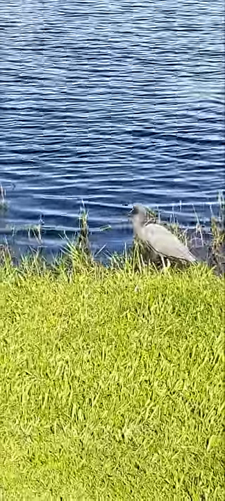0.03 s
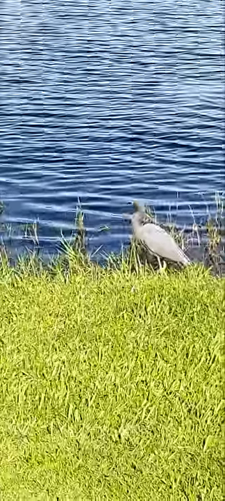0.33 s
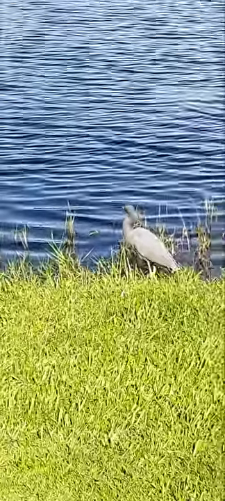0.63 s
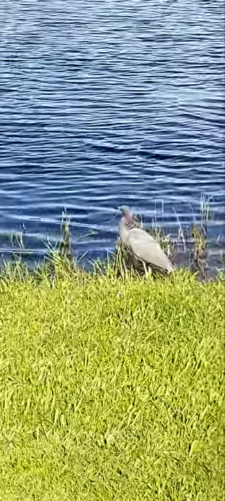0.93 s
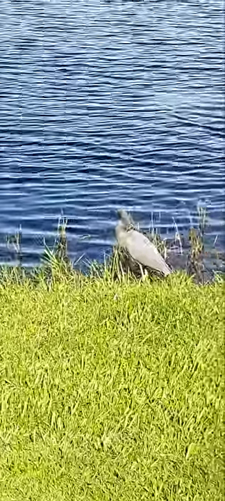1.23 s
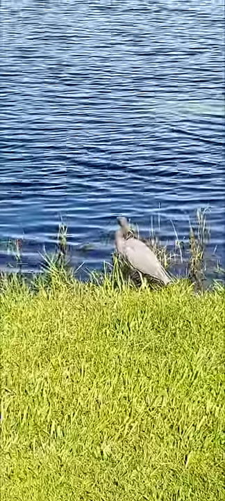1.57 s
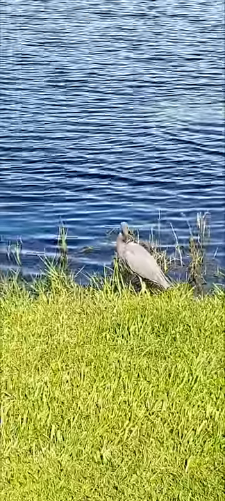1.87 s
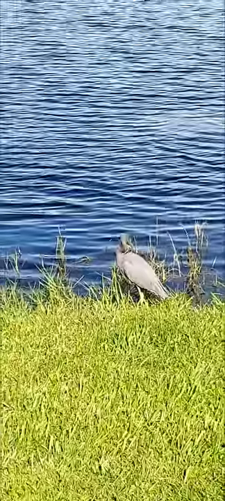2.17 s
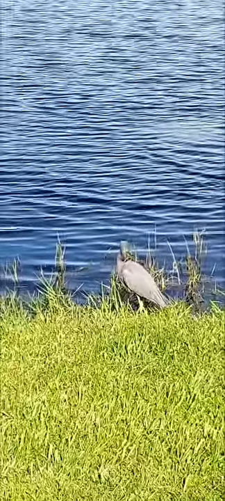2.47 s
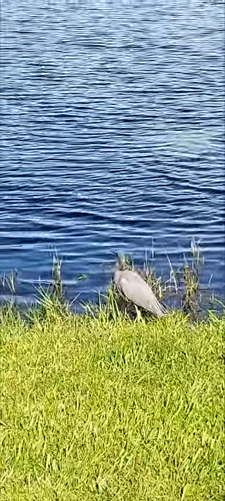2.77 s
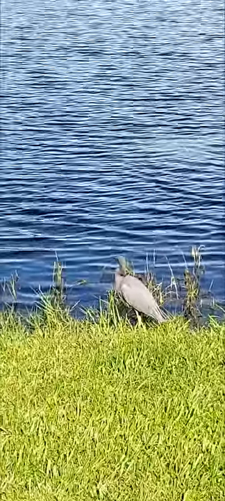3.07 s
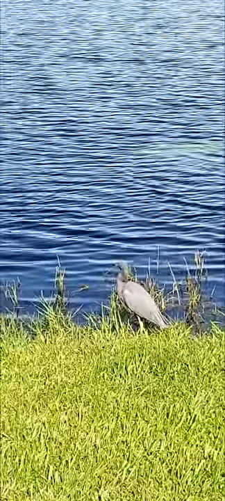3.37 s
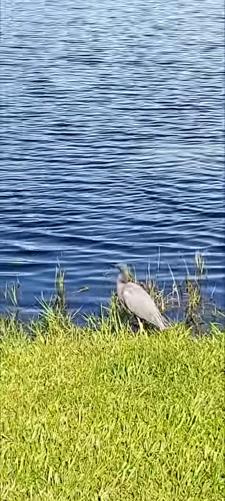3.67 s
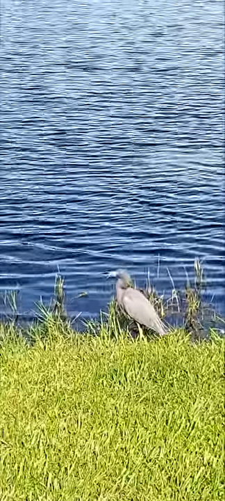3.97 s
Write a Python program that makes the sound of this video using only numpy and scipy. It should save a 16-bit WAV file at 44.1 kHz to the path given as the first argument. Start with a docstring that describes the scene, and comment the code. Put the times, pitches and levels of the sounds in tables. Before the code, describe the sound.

Small birds chirp and peep far off at a lakeside before nearer ones break into loud, high, slurred whistles with a slight echo. Wind brushes the microphone now and then over a low hum of distant traffic.

```python
"""Birds by a lake

Unseen birds call: a run of rising chirps, faint far peeps and thin high chips, then loud slurred
whistles from several near birds at once, thrown back by the banks. Chirps, peeps and whistles are
the wavering, almost pure tone of a syrinx. Distant traffic rumbles underneath, and light gusts
brush the two microphone ports."""
import sys
import numpy as np
from scipy import signal
from scipy.fft import rfft, irfft
from scipy.io import wavfile
from scipy.ndimage import uniform_filter1d

SR = 44100
rng = np.random.default_rng(int(sys.argv[2]) if len(sys.argv) > 2 else 0)


def to_wav(sig):
    """Store sig (one row per channel, or 1-D mono) as 16-bit WAV at the path in sys.argv[1].

    Samples outside -1..1 are clipped; the rate is SR.
    """
    pcm = np.clip(np.atleast_2d(sig), -1, 1) * 32767
    pcm = np.round(pcm).astype(np.int16)
    wavfile.write(sys.argv[1], SR, pcm.T)  # frames by channels


N = 176400
T = np.arange(N) / SR
BIN_HZ = np.fft.rfftfreq(N, 1 / SR)


def amp(db):
    """Decibels to gain."""
    return 10 ** (np.asarray(db) / 20)


def unit(x):
    """Scales to rms 1."""
    return x / np.sqrt(np.mean(x ** 2) + 1e-30)


def over_hz(points):
    """Draws a curve through (freq_hz, value) points on a log-frequency axis."""
    hz, value = np.transpose(points)
    return np.interp(np.log(BIN_HZ + 1), np.log(hz + 1), value)


def fader(points):
    """Gain ride through (time_s, level_db) points."""
    return amp(np.interp(T, *np.transpose(points)))


def add(mix, start_s, sound):
    """Drops a sound into the mix."""
    part = mix[..., max(round(start_s * SR), 0):][..., :sound.shape[-1]]
    part += sound[..., :part.shape[-1]]


def wobble(size, rate_hz):
    """Smooth random motion of rms 1."""
    hz = np.fft.rfftfreq(size, 1 / SR)
    return unit(irfft(rfft(rng.standard_normal(size)) * np.exp(-(hz / rate_hz) ** 2) * (hz > 0), size))


# Stereo image of a far source: freq_hz, coherence
IMAGE_COHERENCE = [(60, 0.97), (110, 1), (200, 0.98), (380, 0.75), (700, 0.52), (1290, 0.89), (2380, -0.12),
                   (4400, -0.93), (8120, -0.04), (15000, -0.0)]
# Its balance: freq_hz, left_over_right_db
IMAGE_BALANCE = [(60, 0), (99, -1), (160, -3), (270, -6), (450, -4.5), (740, 11), (1220, -7.5), (2010, -4),
                 (3330, 9), (5500, -6), (9080, 1.0), (15000, 2.5)]
# Its phase offset: freq_hz, right_lag_rad
IMAGE_PHASE = [(0, 1.6), (250, -0.11), (520, 0.5), (780, -0.37), (1210, 0.7), (2600, 2.5)]

def noise(spectrum, paired=True):
    """Coloured stereo noise, imaged as a far source or else independent on each port."""
    left, right = rfft(rng.standard_normal((2, N)))
    if paired:
        coherence = np.clip(over_hz(IMAGE_COHERENCE), -1, 1)
        balance = amp(over_hz(IMAGE_BALANCE))
        right = coherence * left + np.sqrt(1 - coherence ** 2) * right
        right *= np.exp(-1j * over_hz(IMAGE_PHASE))
        left, right = np.array([left * balance, right]) / np.sqrt(1 + balance ** 2)
    return unit(irfft(np.array([left, right]) * amp(over_hz(spectrum)), N))


# Engine rumble colour: freq_hz, gain_db
RUMBLE_EQ = [(15, -56), (25, -19.5), (48, -10.5), (65, -4.5), (92, -0.5), (108, -6), (123, -4.5),
             (134, -0.5), (168, -10), (205, -6), (352, -21), (375, -29), (480, -29.5), (620, -55.5),
             (1060, -120)]
# Engine hum: pitch_hz, level_against_rumble_db
HUM_TONES = [(120, -5), (351, -28)]
# Ride on rumble and hum: time_s, level_db
ENGINE_RIDE = [(0, -50), (.4, -53), (.8, -54), (1.4, -55), (1.8, -52.5), (2.1, -52), (2.92, -51),
               (3.04, -54), (3.3, -53.5), (4, -52)]
# Tyre wash colour: freq_hz, gain_db
TYRE_EQ = [(240, -41.5), (400, -12), (502, -10), (676, -1), (829, -3.5), (925, -4), (1150, -6),
           (1590, -19.5), (1720, -26), (2440, -34), (2600, -38), (3380, -40.5), (5720, -120)]
# Ride on the tyre wash: time_s, level_db
TYRE_RIDE = [(0, -65), (.4, -66.5), (.62, -65), (.85, -66.5), (1.25, -65.5), (1.75, -66), (2.2, -62.5),
             (2.55, -65), (3.25, -66), (3.55, -62.5), (4, -63)]
# Narrow tyre swells: peak_s, half_length_s, centre_hz, width_hz, level_db
TYRE_SWELLS = [(0.134, 0.12, 884, 150, -66), (2.05, 0.14, 1015, 216, -61), (2.69, 0.08, 736, 114, -68.5)]

def traffic():
    """Far engines rumble and hum under tyre noise that swells now and then."""
    hum = swells = 0
    for pitch_hz, db in HUM_TONES:
        drifting_hz = pitch_hz + 3.62 * wobble(N, rate_hz=5.2)
        hum += amp(db) * unit(np.sin(2 * np.pi * np.cumsum(drifting_hz) / SR))
    for peak_s, half_s, centre_hz, width_hz, db in TYRE_SWELLS:
        phase = 2 * np.pi * centre_hz * T
        band = unit(wobble(N, width_hz) * np.sin(phase) + wobble(N, width_hz) * np.cos(phase))
        swells += amp(db) * band * np.exp(-((T - peak_s) / half_s) ** 2)
    engines = (noise(RUMBLE_EQ) + hum) * fader(ENGINE_RIDE)
    return engines + noise(TYRE_EQ) * fader(TYRE_RIDE) + swells


# Bassy buffeting: freq_hz, gain_db
GUST_EQ = [(15, -29), (30, -19), (45, -3), (60, 3), (85, -5), (130, -16), (200, -22.5), (400, -44),
           (1000, -72.5)]
# Gusts on the left port: time_s, level_db
GUST_RIDE_LEFT = [(0, -47.5), (.04, -50), (.12, -40), (.25, -36), (.33, -42), (.40, -56.5), (.59, -45.5),
                  (.77, -57.5), (1.8, -71), (3.32, -70), (3.42, -46), (3.62, -44), (3.78, -62), (3.88, -53),
                  (3.95, -40), (4, -48)]
# Gusts on the right port: time_s, level_db
GUST_RIDE_RIGHT = [(0, -41), (.14, -36.5), (.27, -34), (.33, -44), (.45, -64), (.9, -58.5), (1.8, -75),
                   (1.88, -48), (2.0, -65), (3.3, -71), (3.55, -43), (4, -61)]
# Airy hiss: freq_hz, gain_db
HISS_EQ = [(1500, -1.5), (2500, 0.5), (3200, 0.5), (4500, 0), (7600, -4), (8300, 2), (9300, -1),
           (10500, -2.5), (13000, -0.5), (16000, 1)]

def wind(hiss_db=-80.5):
    """Gusts buffet each port separately over a faint, steady hiss."""
    gusts = noise(GUST_EQ, paired=False) * np.array([fader(GUST_RIDE_LEFT), fader(GUST_RIDE_RIGHT)])
    return gusts + amp(hiss_db) * noise(HISS_EQ, paired=False)


def syrinx(pitch_hz, level_db, octave_db=-36, rasp_db=-9.5, third_db=-42, fade_s=0.0035):
    """A bird's voice: a wavering tone with weak overtones. The defaults voice a far bird."""
    size = len(pitch_hz)
    t = np.arange(size) / SR
    waver = 1 + 0.0035 * wobble(size, rate_hz=177)
    phase = 2 * np.pi * np.cumsum(pitch_hz * waver) / SR
    phase += amp(rasp_db) * wobble(size, rate_hz=328)  # jitter puts a rasp around the pitch
    tone = np.sin(phase) + amp(octave_db) * np.sin(2 * phase) + amp(third_db) * np.sin(3 * phase)
    fades = np.sin(np.pi / 2 * np.clip(np.minimum(t, t[-1] - t) / fade_s, 0, 1)) ** 2
    flutter_db = 1.04 * wobble(size, rate_hz=92)
    return np.sqrt(2) * fades * amp(level_db + flutter_db) * tone


# The opening run: start_s, rise_s, start_hz, top_hz, level_db
CHIRP_NOTES = [(.492, 0.018, 3400, 3480, -72.5), (0.569, 0.032, 3200, 4010, -73),
               (.662, 0.042, 3270, 4420, -78), (0.751, 0.03, 3220, 4210, -65),
               (0.843, 0.047, 3230, 4380, -72), (.936, 0.043, 3180, 4350, -70),
               (1.028, .048, 3180, 4460, -64), (1.141, 0.035, 2990, 4180, -72.5),
               (1.24, 0.032, 2910, 4200, -67)]

def chirps(fall_per_rise=0.79, fade_db=-18):
    """Far chirps fade as they sweep up, then hook quietly down."""
    out = np.zeros((2, N))
    for start_s, rise_s, start_hz, top_hz, db in CHIRP_NOTES:
        progress = np.arange(0, rise_s * (1 + fall_per_rise), 1 / SR) / rise_s  # 1 at the top
        arch = np.sin(np.pi / 2 * np.interp(progress, [0, 1, 1 + fall_per_rise], [0, 1, 2]))
        level_db = db + fade_db * np.minimum(progress, 1) ** 2
        add(out, start_s, syrinx(start_hz + (top_hz - start_hz) * arch, level_db))
    return out


# Ride on the flock: time_s, level_db
TWITTER_RIDE = [(.4, -95), (.8, -89), (1.3, -83), (1.42, -98.5), (2.5, -87), (4, -77)]

def twitter(notes_per_s=45, centre_hz=3284, spread_hz=190, length_s=0.022):
    """The farthest birds make a faint bed of tiny glides, random in time and pitch."""
    out = np.zeros((2, N))
    progress = np.arange(0, length_s, 1 / SR) / length_s
    for onset in np.flatnonzero(rng.random(N) < notes_per_s / SR):
        detune, slide, accent = rng.standard_normal(3)
        pitch_hz = centre_hz + spread_hz * (detune + 2 * slide * (progress - .5))
        add(out, onset / SR, syrinx(pitch_hz, level_db=2 * accent))
    return out * fader(TWITTER_RIDE)


# Thin high calls: start_s, centre_hz, width_hz, level_db, decay_s
CHIP_HITS = [(0.654, 9300, 1900, -78, .003), (.763, 10300, 1300, -76, .005), (.884, 5680, 300, -83, .01),
             (1.806, 10770, 1300, -71, .003), (1.821, 11300, 1500, -75, .004),
             (1.831, 5800, 2600, -72, .002), (2.46, 5360, 403, -84, .013)]

def chips():
    """Bright ticks of band noise with a hard attack and a fast decay."""
    out = np.zeros((2, N))
    t = np.arange(SR // 20) / SR
    for start_s, centre_hz, width_hz, db, decay_s in CHIP_HITS:
        band = unit(wobble(len(t), width_hz) * np.sin(2 * np.pi * centre_hz * t))
        add(out, start_s, amp(db) * np.exp(-t / decay_s) * band)
    return out


# Scattered far calls: start_s, length_s, start_hz, end_hz, level_db
PEEP_NOTES = [(0.787, 0.018, 3430, 3004, -67), (0.872, 0.018, 3340, 3540, -71),
              (1.003, 0.012, 3670, 3080, -82), (1.094, 0.021, 3760, 3050, -74),
              (1.19, 0.024, 3040, 3430, -75.5), (1.283, 0.036, 3420, 3320, -81),
              (1.59, 0.019, 3190, 3000, -86), (1.723, 0.014, 3160, 3020, -82),
              (2.082, 0.038, 3460, 2930, -77.5), (2.249, 0.025, 3170, 2900, -82),
              (2.468, 0.031, 3490, 3260, -79), (2.915, 0.063, 3260, 3045, -75),
              (3.034, 0.019, 3920, 3240, -73), (3.243, 0.02, 3690, 2970, -70)]

def peeps():
    """Short far peeps slide and ease into their last pitch."""
    out = np.zeros((2, N))
    for start_s, length_s, start_hz, end_hz, db in PEEP_NOTES:
        glide = np.sin(np.pi / 2 * np.arange(0, length_s, 1 / SR) / length_s)
        add(out, start_s, syrinx(start_hz + (end_hz - start_hz) * glide, db))
    return out


# Near song: left_over_right_db, octave_db, curve of (time_s, pitch_hz, level_db)
WHISTLE_NOTES = [ (-7.5, -27, [(2.728, 3750, -81), (2.755, 3170, -73.5), (2.79, 2950, -95)]),
                 (-9, -22.5, [(2.818, 2764, -76), (2.832, 3360, -59), (2.845, 3595, -59),
                 (2.86, 3520, -55.5), (2.877, 3250, -54), (2.903, 2900, -69)]),
                 (-6, -30, [(2.905, 2650, -82), (2.925, 2600, -88), (2.968, 3000, -69.5), (3.01, 3500, -77),
                 (3.06, 4000, -77)]), (-3, -28, [(3.096, 2900, -65.5), (3.11, 3600, -54.5),
                 (3.124, 3830, -48), (3.138, 3910, -49.5), (3.155, 3620, -50), (3.175, 3214, -52),
                 (3.195, 2980, -66), (3.215, 3220, -63), (3.243, 3420, -72)]),
                 (-2, -22.5, [(3.18, 5000, -90), (3.22, 4400, -78), (3.24, 4130, -71), (3.27, 4100, -61),
                 (3.305, 4140, -73), (3.34, 4170, -65)]), (-7.5, -29, [(3.286, 2950, -66),
                 (3.308, 3490, -59), (3.328, 3690, -51), (3.35, 3660, -57), (3.385, 3340, -59.5),
                 (3.41, 3200, -73)]), (-4, -25.5, [(3.398, 3910, -55), (3.425, 3870, -48),
                 (3.455, 3850, -49.5), (3.49, 3920, -54.5), (3.53, 4130, -52.5), (3.555, 4200, -60.5),
                 (3.592, 3860, -51), (3.615, 3510, -50), (3.65, 3350, -61), (3.702, 3330, -68)]),
                 (-1, -28.5, [(3.508, 3000, -75), (3.527, 3480, -50), (3.55, 3850, -58), (3.57, 3940, -46),
                 (3.61, 3920, -63), (3.665, 3950, -51), (3.70, 3880, -54)]), (2.5, -27, [(3.505, 4020, -56),
                 (3.53, 3430, -54), (3.55, 3280, -57.5), (3.572, 3680, -53), (3.59, 4100, -58),
                 (3.612, 4520, -55), (3.632, 4730, -57.5), (3.646, 4720, -69)]),
                 (-2, -22, [(3.705, 3000, -61), (3.725, 3880, -51.5), (3.742, 4420, -65),
                 (3.76, 4520, -58.5), (3.782, 3900, -62), (3.80, 3150, -61), (3.835, 2700, -77)]),
                 (1, -22, [(3.745, 3250, -74), (3.765, 3330, -59.5), (3.783, 3580, -54), (3.80, 3450, -58),
                 (3.822, 3780, -52), (3.845, 4280, -58), (3.872, 4650, -47), (3.894, 5000, -53),
                 (3.903, 5100, -66), (3.928, 5340, -62)]), (-7.5, -24.5, [(3.79, 3650, -54),
                 (3.823, 3250, -56.5), (3.84, 3700, -62), (3.86, 4400, -56), (3.88, 4650, -60),
                 (3.895, 4750, -63)]), (7, -21, [(3.795, 4200, -74), (3.825, 4450, -65),
                 (3.855, 4650, -70)]), (-3.5, -27.5, [(3.88, 4200, -68), (3.897, 3830, -49),
                 (3.922, 3780, -52), (3.95, 3880, -53.5), (3.975, 3970, -54.5), (4.0, 4280, -52)]),
                 (-4, -11, [(3.91, 4500, -67), (3.93, 3650, -67), (3.955, 2750, -85)]),
                 (-5, -24, [(3.982, 3050, -67), (4.005, 3950, -47)])]
# Colour laid over that song: freq_hz, gain_db
WHISTLE_EQ = [(2500, 1.5), (3300, 1), (4000, -2), (4800, 0), (5400, -6), (6200, -4), (6900, -12), (8300, 0),
              (10000, -1), (10600, -6)]

def whistles():
    """Near birds slur long overlapping notes, each with its own pan."""
    out = np.zeros((2, N))
    for pan_db, octave_db, curve in WHISTLE_NOTES:
        time_s, hz, db = np.transpose(curve)
        t = np.arange(time_s[0], time_s[-1], 1 / SR)
        slurred_hz = uniform_filter1d(np.interp(t, time_s, hz), size=500, mode="nearest")
        note = syrinx(slurred_hz, np.interp(t, time_s, db), octave_db, rasp_db=-21)
        add(out, time_s[0], amp([[pan_db / 2], [-pan_db / 2]]) * note)
    return irfft(rfft(out) * amp(over_hz(WHISTLE_EQ)), N)


# Bank slapback on the near birds: delay_s, left_db, right_db
NEAR_SLAPS = [(.0065, -3.5, -16.5), (0.013, -6.5, -12), (.021, -18, -28)]
# Bank slapback on the far birds: delay_s, left_db, right_db
FAR_SLAPS = [(0.0106, -3, -4)]
SCATTER_RT60_S, TAIL_RT60_S, SCATTER_OVER_TAIL_DB = 0.11, 0.48, 5
SHEEN_HZ, SHEEN_DB = 6900, 14.5  # the banks scatter the treble more

def lakeside(dry, wet_db, slaps, taps_per_s=3000, build_s=0.0034, right_lag_s=0.00011):
    """Sound reaches the left port first; bank echoes, quick shore scatter and a faint tail follow."""
    t = np.arange(SR // 2) / SR
    taps = rng.standard_normal((2, 2, len(t))) * (rng.random((2, 2, len(t))) < taps_per_s / SR)
    rt60_s = np.array([SCATTER_RT60_S, TAIL_RT60_S])[:, None, None]
    decays = taps * amp(-60 * t / rt60_s) * np.minimum(t / build_s, 1)
    scatter, tail = decays / np.linalg.norm(decays, axis=2, keepdims=True)
    response = amp(wet_db) * (amp(SCATTER_OVER_TAIL_DB) * scatter + tail)
    highpass = signal.butter(3, SHEEN_HZ, "high", fs=SR, output="sos")
    response += amp(SHEEN_DB) * signal.sosfiltfilt(highpass, response)
    add(response[0], 0, np.ones(1))  # direct sound
    add(response[1], right_lag_s, np.ones(1))
    for delay_s, left_db, right_db in slaps:
        add(response, delay_s, amp([[left_db], [right_db]]))
    return signal.fftconvolve(dry, response, axes=1)[:, :N]


def scene(far_trim_db=-4.5):
    """Near birds up front, far birds wetter and trimmed down, over a bed of traffic and wind."""
    bed = traffic() + wind()
    near = lakeside(whistles(), wet_db=-14.5, slaps=NEAR_SLAPS)
    near += lakeside(chips(), wet_db=-21, slaps=NEAR_SLAPS)
    far = lakeside(chirps() + peeps() + twitter(), wet_db=-8.5, slaps=FAR_SLAPS)
    return bed + near + amp(far_trim_db) * far


def record(dry, cutoff_hz=15750):
    """A steep low-pass takes off the very top."""
    lowpass = signal.firwin(511, cutoff_hz, window=("kaiser", 9), fs=SR)
    return signal.oaconvolve(dry, lowpass[None], "same")


dry = scene()
out = record(dry)
to_wav(out)
```